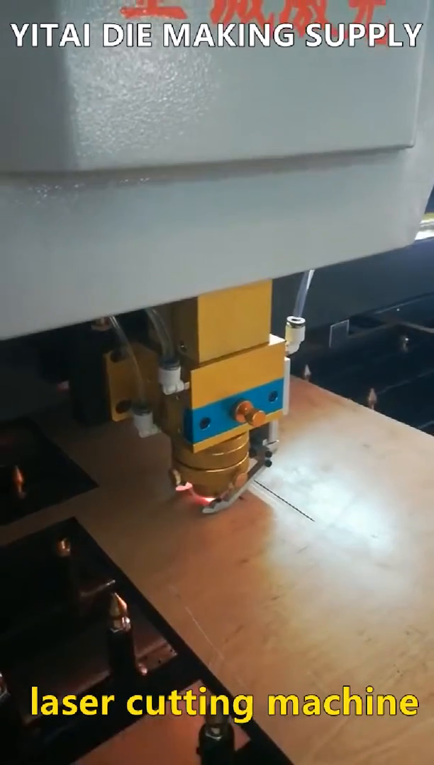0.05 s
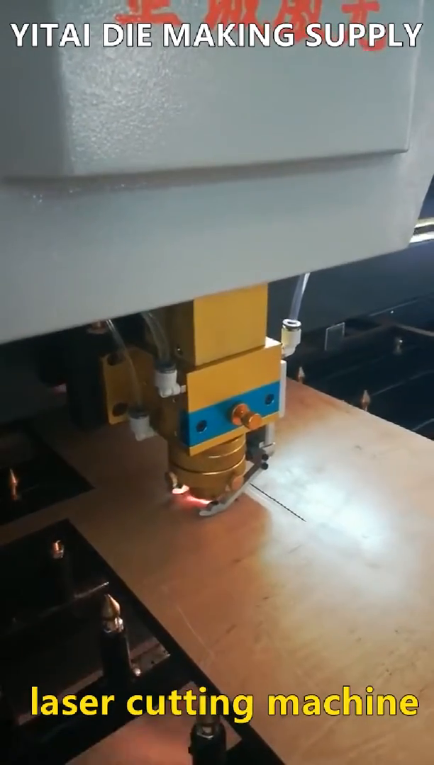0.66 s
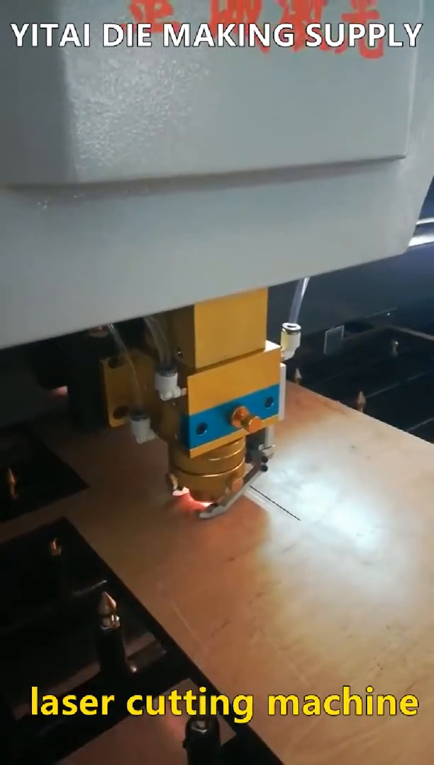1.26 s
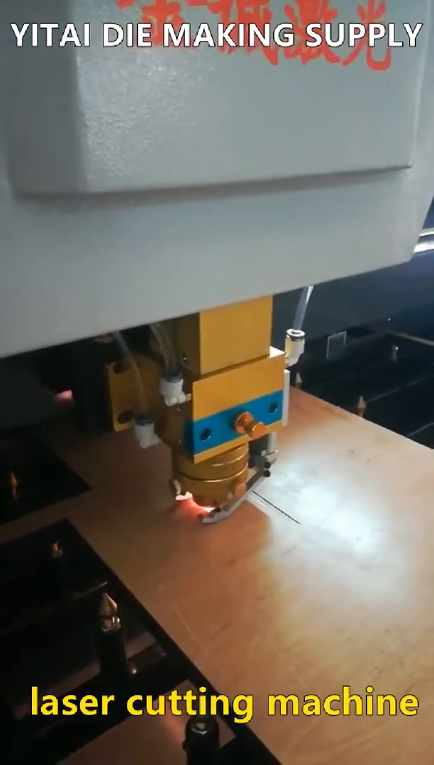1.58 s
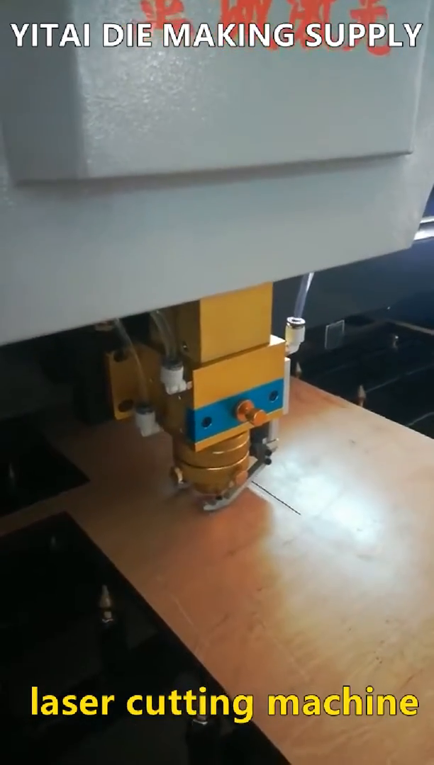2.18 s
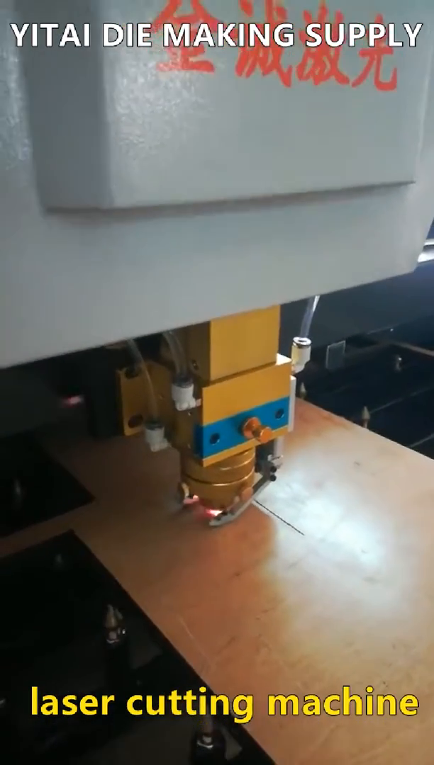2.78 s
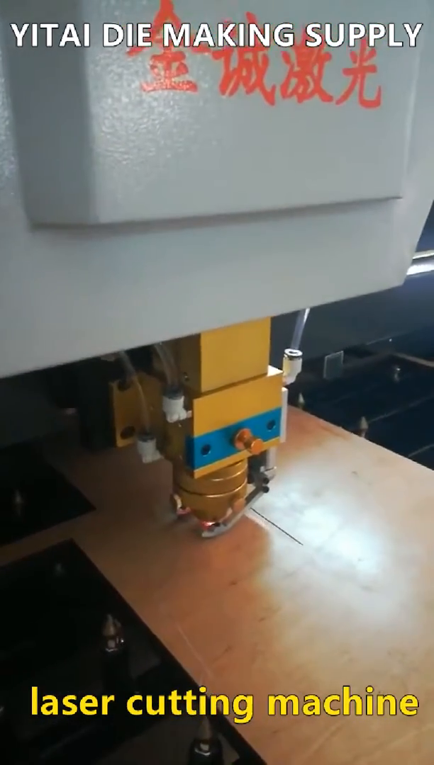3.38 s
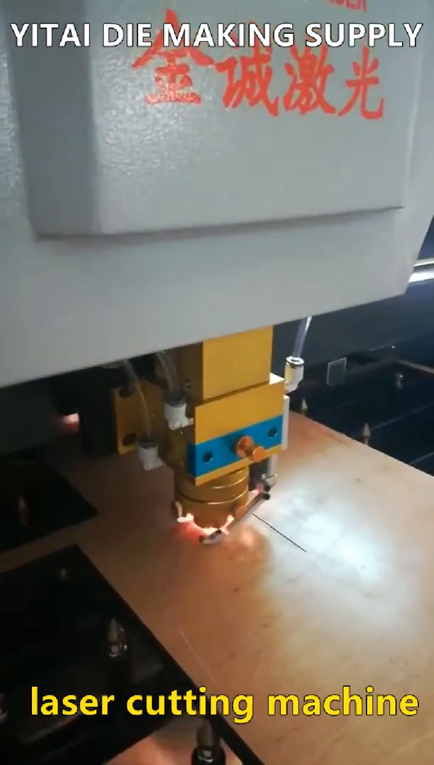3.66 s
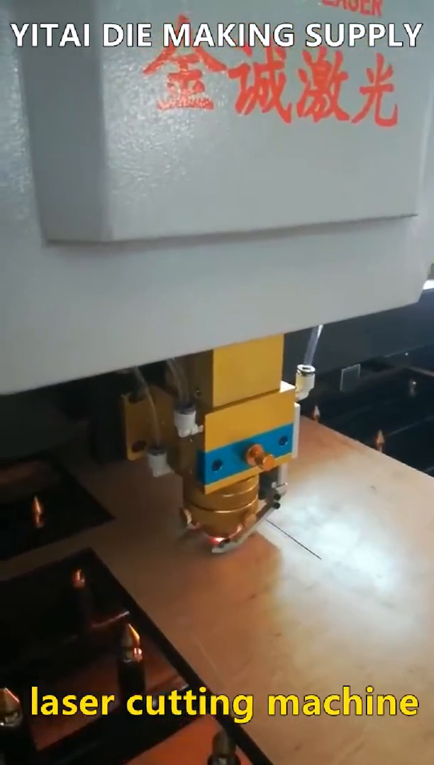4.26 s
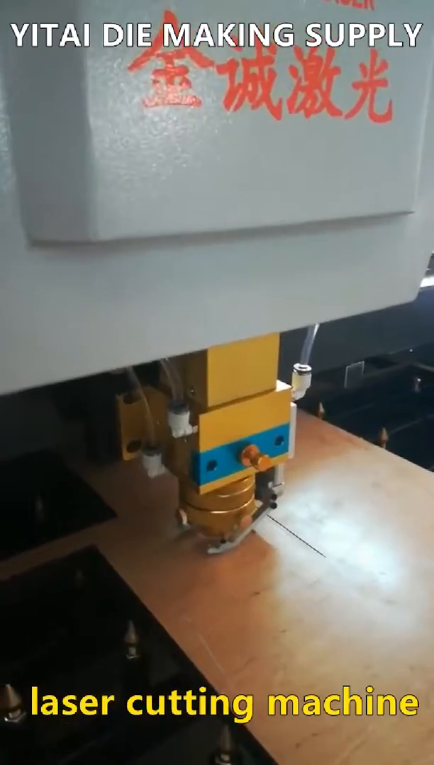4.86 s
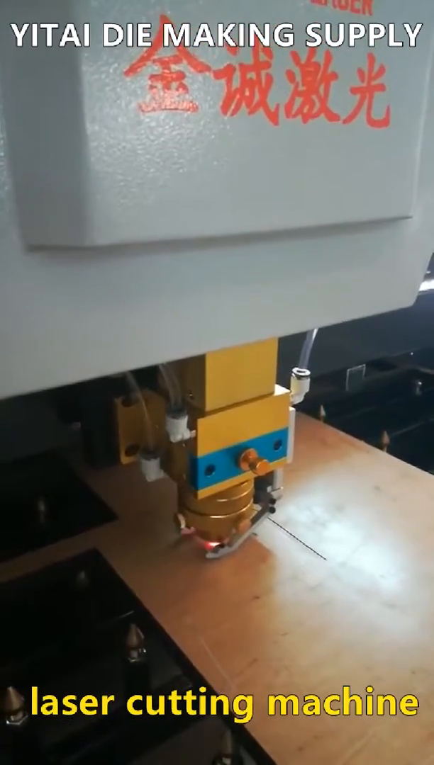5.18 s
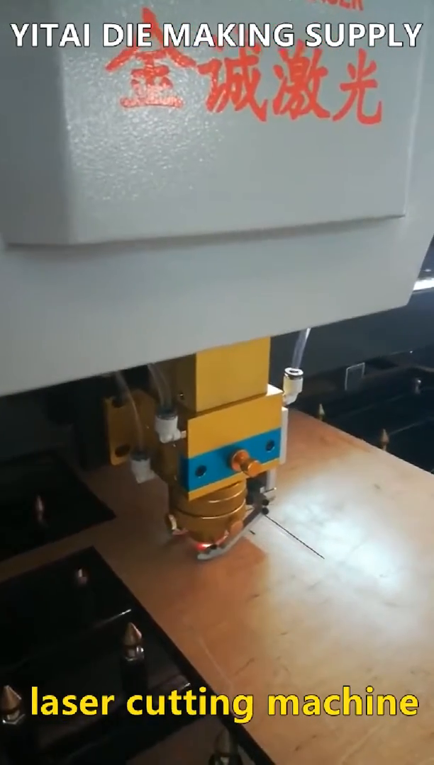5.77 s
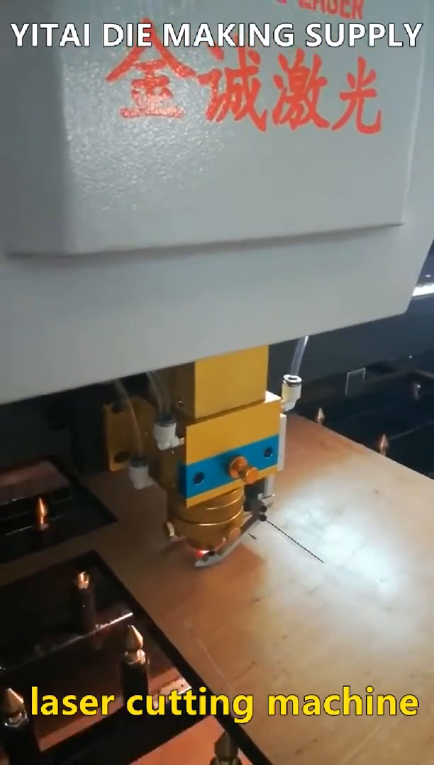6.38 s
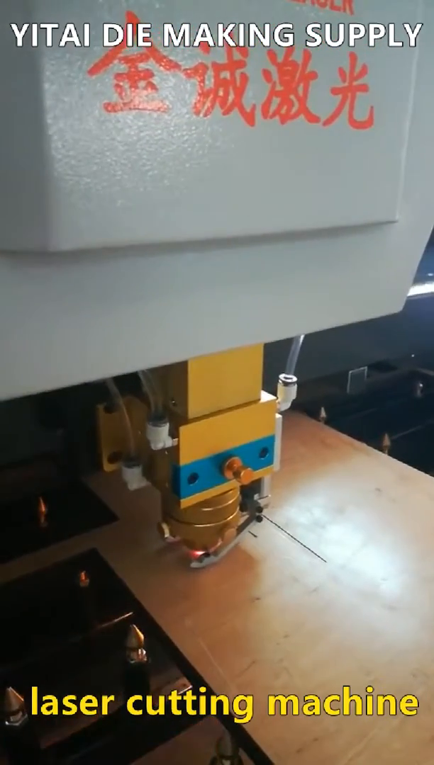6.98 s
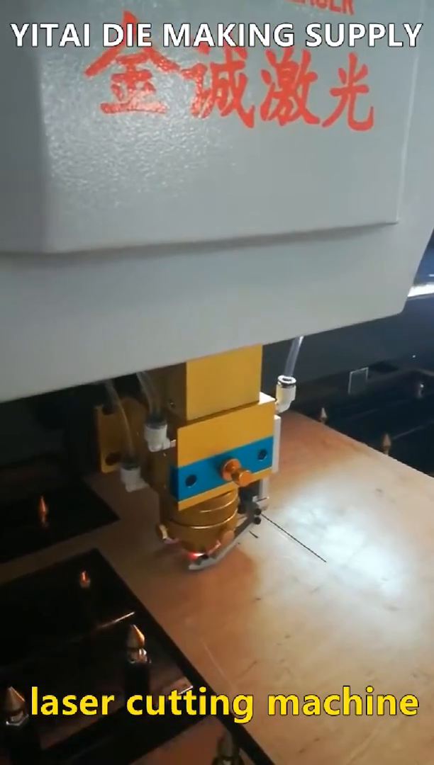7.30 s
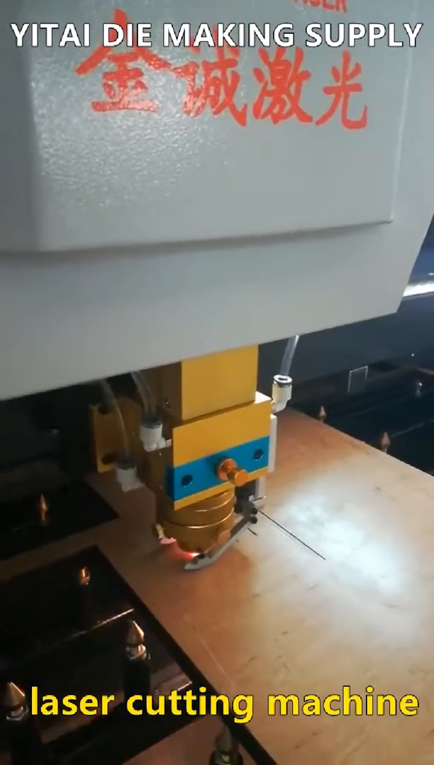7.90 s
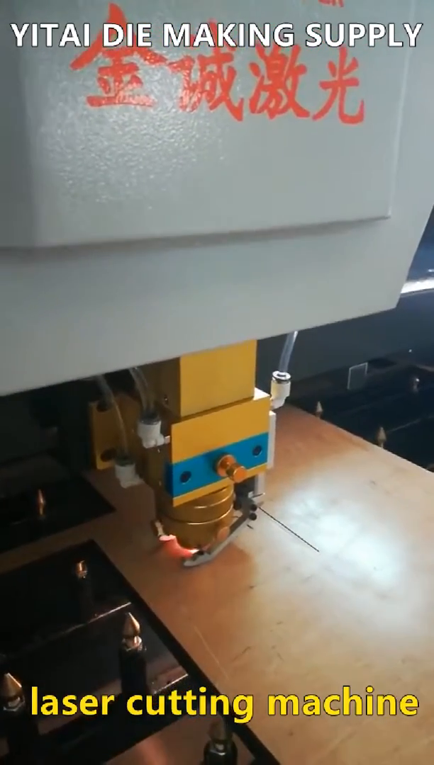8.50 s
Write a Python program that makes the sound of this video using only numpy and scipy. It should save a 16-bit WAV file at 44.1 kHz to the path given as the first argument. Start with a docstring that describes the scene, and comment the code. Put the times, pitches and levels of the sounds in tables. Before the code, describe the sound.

A laser cutter hisses brightly and steadily through a wooden board, with hollow gusts of air, a few spits and pops, over a low hum.

```python
"""A bright, steady hiss of air, broken by hollow roars: a laser cutter burning a slot in a wooden board.
Assist air hisses and whistles at the nozzle, and roars when it gusts through the slot and rings the
hollow bed. Burning resin spits and the heated wood pops. Underneath, the exhaust fan rumbles through
the workshop while the machine's hum sinks in pitch and gives way to a low drone."""
import sys
import numpy as np
from scipy import signal
from scipy.fft import rfft, irfft
from scipy.io import wavfile

SR = 44100
rng = np.random.default_rng(int(sys.argv[2]) if len(sys.argv) > 2 else 0)


def generate_wav(sig):
    """Save sig (samples, or channels by samples) to the path in sys.argv[1] as 16-bit PCM at SR."""
    pcm = np.round(np.clip(np.atleast_2d(sig).T, -1, 1) * 32767).astype(np.int16)
    wavfile.write(sys.argv[1], SR, pcm)


N = 385434
TIME = np.arange(N) / SR
HZ = np.fft.rfftfreq(N, 1 / SR)

# level ride of the nozzle's air jet, slowly easing off: time_s, level_db, sizzle_db
JET_RIDE = [(0, -32, -1.5), (0.25, -33.5, 1), (0.5, -34.5, 0), (1.2, -34.5, 0.5), (2.02, -33, -1.5),
            (2.24, -32.5, 3), (2.45, -34.5, -1), (3.0, -34, 3), (3.35, -33, -2), (3.7, -34.5, -0.5),
            (4.6, -34, 0.5), (5.15, -36, 2), (5.45, -35.5, 1.5), (6.35, -33.5, -1.5), (6.75, -36, 0),
            (7.45, -33.5, -1), (8.05, -35.5, 1.5), (8.74, -35, -1)]
# tone colour of the hiss: freq_hz, gain_db
JET_COLOUR = [(1500, -18.5), (2500, -11.5), (3500, -9), (5000, -6), (6200, -3.5), (7500, -1.5), (8200, -4),
              (8900, -4.5), (9900, -10.5), (11800, -17), (14000, -19.5), (16000, -26)]
# stereo placement of the hiss: freq_hz, left_minus_right_db
JET_PAN = [(2000, -3.5), (3000, 7), (4200, 2.5), (6000, 1.5), (7500, -4), (9000, 1.5), (10500, 0),
           (12000, -0.5)]
# brief drops in the hiss: start_s, length_s, depth_db
JET_DIPS = [(1.72, 0.22, -5.5), (3.7, 0.32, -2), (7.618, 0.2, -2.5)]
# ring of the gap under the nozzle, shifting as the cut advances: time_s, pitch_hz, level_re_hiss_db
GAP_RING = [(0, 7350, -2), (0.9, 7350, -2.5), (1.5, 7650, -4.5), (2.3, 7650, -5), (2.9, 7650, -7.5),
            (3.4, 7720, -2.5), (3.8, 7500, -6), (4.3, 7250, -1.5), (4.9, 7400, -3), (5.4, 7500, -3.5),
            (6.0, 7400, -6), (6.5, 7450, -7), (7.2, 7400, -4), (7.58, 7550, -3), (7.9, 7550, -5),
            (8.74, 7500, -4)]
# thin whistles at the nozzle: start_s, end_s, pitch_hz, width_hz, level_db, fade_db_per_s
WHISTLES = [(-0.2, 1.4, 7290, 65, -38.5, 9), (-0.1, 0.6, 4600, 83.33, -48, 10),
            (-0.1, 1.1, 6460, 160, -46, 2), (2.0, 3.696, 8930, 280.8, -49, 1.5),
            (2.8, 3.7, 7760, 150, -44, 2), (5.302, 7.8, 7525, 37.04, -51, -1),
            (5.398, 7.7, 7925, 70, -50.5, -1), (5.198, 7.6, 6830, 64.8, -51, 1),
            (6.702, 7.8, 6600, 120, -50, 0)]

# gusts breaking through the slot: start_s, length_s, rise_s, level_db, brightness_db, slot_pitch_hz
GUSTS = [(0.04, 0.16, 0.04, -51, 4, 2350), (0.2, 0.12, 0.054, -37, 0, 2390),
         (1.001, 0.169, 0.1, -42.5, -5, 2298), (1.46, 0.22, 0.18, -42, -2, 2300),
         (2.462, 0.2, 0.04, -40, -4, 2307), (3.587, 0.15, 0.057, -34, -4.5, 2410),
         (3.68, 0.61, 0.059, -37.5, 3, 2460), (3.921, 0.27, 0.09, -36, -0.5, 2250),
         (4.285, 0.13, 0.011, -35.5, -3.5, 2147), (4.516, 0.089, 0.078, -34.5, -1.5, 1860),
         (4.66, 0.18, 0.05, -52, 8.5, 1800), (5.709, 0.044, 0.05, -34.5, 1, 2096),
         (5.845, 0.24, 0.035, -32, 0, 2138), (6.261, 0.096, 0.052, -34.5, 2, 2000),
         (6.291, 0.21, 0.058, -39, 9.5, 2050), (6.44, 0.34, 0.075, -35, -2, 2200),
         (6.861, 0.34, 0.17, -40, -1.5, 2160), (7.415, 0.17, 0.037, -38.5, 2, 1995),
         (7.503, 0.12, 0.074, -33.5, -2.5, 2106), (7.64, 0.035, 0.03, -43, -5, 2110),
         (8.57, 0.17, 0.15, -39.5, 3.5, 1994)]
# tone colour of the roar: freq_hz, gain_db
ROAR_COLOUR = [(300, -21), (480, -9), (600, -5.5), (730, -2), (850, -6.5), (1050, -1.5), (1400, -2.5),
               (2150, -3), (2400, -10.5), (2600, -4), (3050, -11.5), (4800, -11), (7000, -23), (10000, -55)]
# stereo placement of the roar: freq_hz, left_minus_right_db
ROAR_PAN = [(500, 0.5), (800, -7), (1000, -6.5), (1300, 2.5), (1650, 1.5), (2200, 0.5), (2650, -3.5),
            (3500, -2)]
# resonances of the hollow bed: freq_hz, width_hz, boost_db
BED_RESONANCES = [(589, 30, 5), (1030, 300, 2.5), (1250, 95, 4.5), (1600, 39, 7), (2532, 45, 6),
                  (2687, 60, 4.5)]
# the bed's two main cavity modes: pitch_hz, width_hz, level_db
BED_CAVITY_MODES = [(959, 76, -4.3), (1076, 110, -8)]
# scrapes of the jet along the slot wall: start_s, length_s, level_db
RASPS = [(0.04, 0.24, -34.5), (4.17, 0.11, -34), (6.31, 0.097, -33), (7.5, 0.079, -41)]
# tone colour of the scrapes: freq_hz, gain_db
RASP_COLOUR = [(1200, -20), (2300, -15), (3200, -5), (3800, -7.5), (4550, -2), (4900, -2), (5300, -3),
               (5900, -9), (7000, 2), (10000, -30)]

# spits of burning resin: start_s, level_db, rise_s, decay_s, brightness_db
SPITS = [(3.989, -35, 0.11, 0.09, 3), (4.1, -34, 0.015, 0.06, 5), (4.19, -18, 0.0089, 0.043, 7),
         (4.213, -25, .003, 0.025, 0.5), (4.266, -21.5, 0.0025, 0.033, -3.5), (4.289, -36, .003, 0.033, 1),
         (4.345, -27, 0.0032, 0.021, 1), (4.399, -27, 0.0027, 0.012, 2), (4.436, -27.5, 0.0024, 0.018, 1),
         (5.15, -28.5, 0.015, 0.035, 8), (5.215, -32, 0.0063, 0.025, 6)]
# tone colour of their fizz: freq_hz, gain_db
SPIT_COLOUR = [(1500, -31), (3900, -17), (5000, -4.5), (6300, 1), (7200, 5.5), (8400, -2), (9800, -17.5),
               (14000, -35)]
# dry pops of the heated wood: time_s, snap_db, snap_width_s, scatter_db, scatter_decay_s
POPS = [(2.5927, -11, 0.000047, -20.5, 0.003), (4.892, -14, 0.00008, -23, 0.002)]
# tone colour of the scatter after a pop: freq_hz, gain_db
SCATTER_COLOUR = [(500, -22), (1100, -17), (1600, 3), (3000, 3), (4500, -5), (8500, 6), (11000, -14),
                  (15000, -28)]
# low swells of air under the board: start_s, length_s, level_db
SWELLS = [(0.95, 0.18, -40), (2.1, .22, -35.5)]
# tone colour of the swells: freq_hz, gain_db
SWELL_COLOUR = [(150, 0), (260, -4.5), (350, 9), (420, -4), (520, -22), (900, -10), (2000, -40)]

# the machine's sinking hum: time_s, pitch_hz, level_db
HUM = [(0, 139, -28), (.44, 143.9, -29), (.6, 145, -36.5), (1.25, 143, -39), (1.4, 144.8, -33.5),
       (2.2, 144.6, -32.5), (2.48, 140.2, -52), (2.58, 135, -25.5), (2.9, 140, -30), (3.4, 136.8, -30),
       (3.7, 129.7, -29), (3.95, 126.2, -29.5), (4.38, 126.2, -32), (4.58, 127.7, -23),
       (4.75, 128.8, -27.5), (4.9, 129.4, -80)]
# the lower drone that takes over: time_s, pitch_hz, level_db
DRONE = [(3.05, 101.8, -49), (3.68, 100.8, -30), (3.87, 100.4, -48), (4.44, 101.5, -57), (4.53, 102.4, -25),
         (4.7, 101.6, -34), (4.78, 96.6, -21), (5.12, 95.8, -30), (5.36, 97, -23), (6.05, 96.6, -26.5),
         (6.22, 96.6, -32), (6.38, 96.7, -24), (6.85, 96.2, -26.5), (7.45, 96.6, -24), (7.9, 96.5, -23.5),
         (8.3, 97.5, -29.5)]
# spectrum of the exhaust fan and workshop air: freq_hz, density_db
FAN_COLOUR = [(15, -73), (35, -66.5), (55, -60), (85, -53.5), (125, -51.5), (170, -59.5), (250, -62),
              (300, -66.5), (390, -65), (450, -74.5), (1100, -73.5), (2200, -81), (5000, -80.5),
              (15000, -105)]
# resonances of the exhaust duct: freq_hz, width_hz, boost_db
DUCT_RESONANCES = [(49, 3.7, 6.5), (195.4, 8.8, 8.5), (216.8, 5.3, 11.5), (250, 8.4, 5), (360.6, 6.1, 4),
                   (481.7, 7.9, 9), (787, 61, 6), (966, 13, 8.5), (1124, 25, 3), (1770, 40, 7)]
# stereo image of the turbulence: freq_hz, left_right_correlation
STEREO_CORRELATION = [(40, 1), (100, 0.89), (180, 0.93), (260, 0.9), (340, 0.5), (500, -0.61), (720, -0.31),
                      (950, 0.17), (1300, 0.22), (1700, 0.2), (2400, -0.31), (3000, 0.2), (7000, 0.00085),
                      (15000, 0.09)]


def nozzle_jet(flow_db):
    """Assist air hisses from the nozzle and rings the gap under it, dulling as air escapes by the slot."""
    level_db, sizzle_db = curves(JET_RIDE)
    ring_hz, ring_db = curves(GAP_RING)
    dip_db = sum(depth * envelope(start, length, rise_s=0.095, fall_s=0.034)
                 for start, length, depth in JET_DIPS)
    dull_db = -2 * from_db(flow_db + 28.5)  # a flow of -28.5 dB costs 2 dB of sizzle
    hiss = unit_rms(turbulence(panned(colour(JET_COLOUR), JET_PAN)))
    hiss = brighten(hiss, above_hz=8600, db=sizzle_db + dull_db + 0.72 * wander(25))
    ring = air_tone(ring_hz + 89.1 * wander(9), width_hz=990)
    upper_ring = from_db(sizzle_db - 10.5) * air_tone(ring_hz + 1200, width_hz=740)
    ring = unit_rms((ring + upper_ring) * from_db([[-6], [0]]))  # beams to the right
    ring *= from_db(ring_db + 1.3 * wander(20))
    air = hood_reflections(hiss + ring, wet_db=-5, first_s=0.001, spread_s=0.014)
    flutter_db = 0.49 * wander(48) + 0.75 * wander(7.5)
    return air * from_db(level_db + dip_db + flutter_db + 2.0)


def nozzle_whistles():
    """Faint edge tones waver in the hiss and slip back into it, right of centre."""
    out = np.zeros((2, N))
    for start, end, hz, width, db, fade in WHISTLES:
        gate = np.clip(np.minimum(TIME - start, end - TIME) / 0.16, 0, 1)
        faded_db = fade * np.clip(TIME - start, 0, end - start)
        waver_db = 1.8 * wander(9)
        out += from_db(db - faded_db + waver_db) * gate * air_tone(hz, width)
    return out * from_db([[-4], [2]])


def slot_flow(leak_db=-52.5, leak_bright_db=6):
    """Level and brightness, in dB, of the air in the slot: a steady leak plus the gusts."""
    power = from_db(leak_db) ** 2
    treble = from_db(leak_db + leak_bright_db) ** 2
    for start, length, rise, db, bright_db, _ in GUSTS:
        gust = (from_db(db) * envelope(start, length, rise, fall_s=0.099)) ** 2
        power += gust
        treble += gust * from_db(bright_db) ** 2
    return 10 * np.log10(power), 10 * np.log10(treble / power)


def slot_roar(flow_db, bright_db):
    """Rough gusts scrape the slot wall and ring the hollow bed; the slot's pitch slides between gusts."""
    air = turbulence(panned(colour(ROAR_COLOUR, BED_RESONANCES), ROAR_PAN))
    air = hood_reflections(air, wet_db=-2, first_s=0.004, spread_s=0.03)
    slot_hz, = curves([(start + length / 2, hz) for start, length, *_, hz in GUSTS])
    rough_db = 2.5 * wander(74)
    slot_ring = from_db(bright_db + rough_db - 14.5) * air_tone(slot_hz, width_hz=350)
    air = brighten(air, above_hz=1170, db=bright_db + wander(13))
    body = (air + slot_ring + bed_ring()) * from_db(flow_db + 0.6)
    rasp = bursts(RASPS, rise_s=0.05, fall_s=0.067) * coloured_noise(RASP_COLOUR)
    flutter_db = wander(22)
    return (body + rasp) * from_db(flutter_db)


def bed_ring(left_lag_s=0.00018, diffuse_gain=0.47):
    """The bed's cavity sings like a blown bottle, off to the right: later and softer on the left."""
    direct, diffuse = sum(from_db(db) * air_tone(hz, width) for hz, width, db in BED_CAVITY_MODES)
    left = np.interp(TIME - left_lag_s, TIME, direct + diffuse_gain * diffuse)
    right = direct - diffuse_gain * diffuse
    return np.array([left, right]) * from_db([[-4], [-0.5]])


def edge_howl(start_s=2.495, from_hz=1345, to_hz=1430, glide_s=0.0695, level_db=-34, sag_db_per_s=17):
    """The jet catches the edge of the cut: a short hollow tone glides up and fades."""
    age = np.maximum(TIME - start_s, 0)
    hz = to_hz + (from_hz - to_hz) * np.exp(-age / glide_s)
    core = air_tone(hz, width_hz=60)
    breath = from_db(-1) * air_tone(hz * 0.96, width_hz=330)
    shape = envelope(start_s, length_s=0.2, rise_s=0.015, fall_s=0.22)
    return from_db(level_db - sag_db_per_s * age) * shape * (core + breath)


def resin_spits():
    """Gas bursts from the burning wood: a quick attack and a fizzing tail."""
    power = np.zeros(N)
    for start, db, rise, decay, _ in SPITS:
        age = np.maximum(TIME - start, 0)
        attack = 1 - np.exp(-age / rise)
        power += (from_db(db) * attack) ** 2 * np.exp(-age / decay)
    sputter_db = 0.88 * wander(166)
    bright_db, = curves([(start, bright) for start, *_, bright in SPITS])
    fizz = brighten(coloured_noise(SPIT_COLOUR), above_hz=7000, db=bright_db)
    return np.sqrt(power) * from_db(sputter_db) * fizz


def wood_pops():
    """Heated wood snaps left of centre; each snap scatters off the head and echoes briefly in the hood."""
    scatter = coloured_noise(SCATTER_COLOUR)
    out = np.zeros((2, N))
    for start, snap_db, width, scatter_db, decay in POPS:
        offset = (TIME - start) / width
        snap = -offset * np.exp((1 - offset ** 2) / 2)  # one push and pull of pressure
        out += from_db(snap_db) * snap * from_db([[0], [-4]])
        age = np.maximum(TIME - start, 0)
        echo = from_db(-16) * np.exp(-age / 0.016)
        tail = (TIME >= start) * (np.exp(-age / decay) + echo)
        out += from_db(scatter_db) * tail * scatter
    return out


def air_swells():
    """Air rushes beneath the board, soft and hollow, early in the cut."""
    return bursts(SWELLS, rise_s=0.093, fall_s=0.12) * coloured_noise(SWELL_COLOUR)


def machine_hum(course, waver_db, octave_db):
    """The machine vibrates with a nearly pure, wavering tone and a weak octave."""
    hz, db = curves(course)
    phase = 2 * np.pi * np.cumsum(hz) / SR + 0.037 * wander(2.9)
    start_s = course[0][0]
    level = (TIME >= start_s) * from_db(db + waver_db * wander(6.7))
    return np.sqrt(2) * level * (np.sin(phase) + from_db(octave_db) * np.sin(2 * phase))


def exhaust_fan():
    """The fan rumbles through the duct's resonances, its level swaying by about a decibel."""
    return turbulence(colour(FAN_COLOUR, DUCT_RESONANCES)) * from_db(wander(11.4))


def hood_reflections(x, wet_db, first_s, spread_s, count=24):
    """Reflections off the hood and bed comb the sound; two patterns crossfade as the head travels."""
    delays = np.round((first_s + spread_s * rng.random((2, 2, count))) * SR).astype(int)
    taps = np.zeros((2, 2, N))
    np.put_along_axis(taps, delays, rng.choice([-1, 1], delays.shape) / np.sqrt(count), axis=2)
    at_start, at_end = irfft(rfft(taps) * rfft(x), N)
    travel = np.pi * TIME / TIME[-1]
    return unit_rms(x + from_db(wet_db) * (at_start * np.cos(travel) + at_end * np.sin(travel)))


def turbulence(gain):
    """Stereo noise with a given gain per bin: centred in the bass, wide above."""
    mid, side = rfft(rng.standard_normal((2, N)))
    correlation = spectrum_curve(STEREO_CORRELATION)
    side *= np.sqrt((1 - correlation) / (1 + correlation))
    return irfft(np.array([mid + side, mid - side]) * gain * np.sqrt(SR / 2), N)


def coloured_noise(points):
    """Turbulence of a given tone colour, at unit level."""
    return unit_rms(turbulence(colour(points)))


def air_tone(hz, width_hz):
    """A breathy tone: a narrow band of stereo noise that follows a pitch."""
    phase = 2 * np.pi * np.cumsum(hz * np.ones(N)) / SR
    pole = np.exp(-np.pi * width_hz / SR)
    white = rng.standard_normal((2, N)) + 1j * rng.standard_normal((2, N))
    drift = signal.lfilter([1], np.poly([pole, pole]), white)
    return unit_rms((drift * np.exp(1j * phase)).real)


def wander(rate_hz):
    """Smooth random modulation of rms 1, up to about the given rate."""
    x = irfft(rfft(rng.standard_normal(N)) / (1 + (HZ / rate_hz) ** 4), N)
    return x / x.std()


def brighten(x, above_hz, db):
    """A high shelf whose gain may move in time."""
    treble = irfft(rfft(x) * (1 - 1 / (1 + (HZ / above_hz) ** 10)), N)
    return x + (from_db(db) - 1) * treble


def colour(points, resonances=()):
    """Gain per bin: a broad EQ curve with resonant peaks on it."""
    peaks_db = sum(db / (1 + (2 * (HZ - hz) / width) ** 2) for hz, width, db in resonances)
    return from_db(spectrum_curve(points) + peaks_db)


def panned(gain, pan):
    """Splits a tone colour into left and right."""
    return gain * from_db(spectrum_curve(pan) * np.array([[0.5], [-0.5]]))


def envelope(start_s, length_s, rise_s, fall_s):
    """Ramps toward 1 and holds; dies away once its length is up."""
    age = TIME - start_s
    return np.clip(age / rise_s, 0, 1) * np.exp(-np.maximum(age - length_s, 0) / fall_s)


def bursts(rows, rise_s, fall_s):
    """Gain over time for bursts that share an attack and release."""
    return sum(from_db(db) * envelope(start, length, rise_s, fall_s) for start, length, db in rows)


def curves(rows):
    """One automation curve for each column after the time."""
    times, *columns = np.transpose(rows)
    return [np.interp(TIME, times, column) for column in columns]


def spectrum_curve(points):
    """Joins points over log frequency, giving a value at every bin."""
    hz, value = np.transpose(points)
    return np.interp(np.log(HZ + 1), np.log(hz + 1), value)


def unit_rms(x):
    """Scales a stereo sound so that its centre has rms 1."""
    return x / np.sqrt(np.mean(x.mean(0) ** 2) + 1e-20)


def from_db(db):
    """Decibels to gain."""
    return 10 ** (np.asarray(db) / 20)


def scene():
    """The mix: rushing air and burning wood over a floor of hum and rumble."""
    hum = machine_hum(HUM, waver_db=1.0, octave_db=-21.5)
    drone = machine_hum(DRONE, waver_db=1.5, octave_db=-27.5)
    background = hum + drone + exhaust_fan() + air_swells()
    flow_db, bright_db = slot_flow()
    air = nozzle_jet(flow_db) + nozzle_whistles() + slot_roar(flow_db, bright_db) + edge_howl()
    return air + resin_spits() + wood_pops() + background


def record(dry, cutoff_hz=15600):
    """A steep low-pass trims the very top of the mix."""
    lowpass = signal.firwin(511, cutoff_hz, window=("kaiser", 9), fs=SR)
    return signal.oaconvolve(dry, lowpass[None], "same")


dry = scene()
out = record(dry)
generate_wav(out)
```